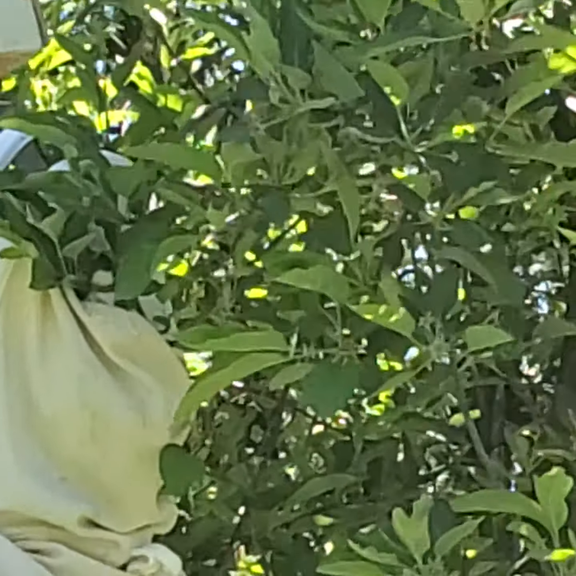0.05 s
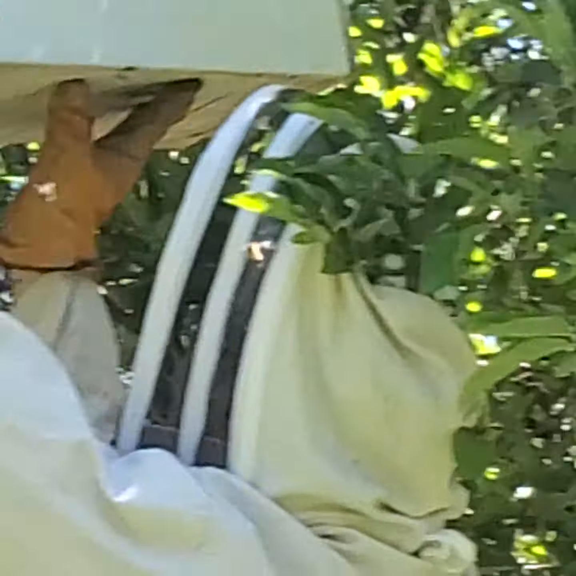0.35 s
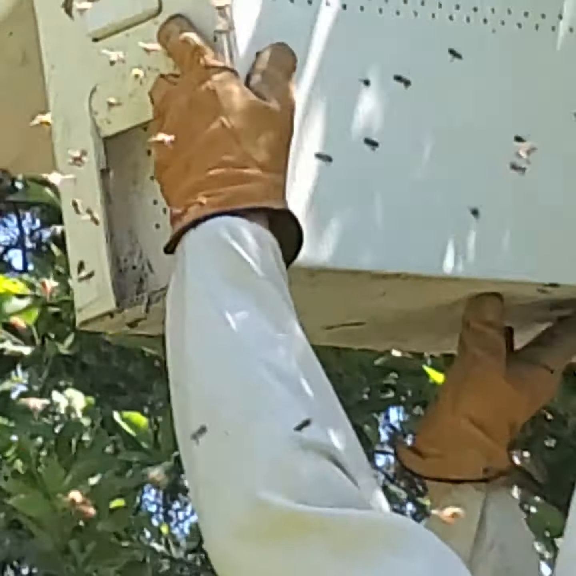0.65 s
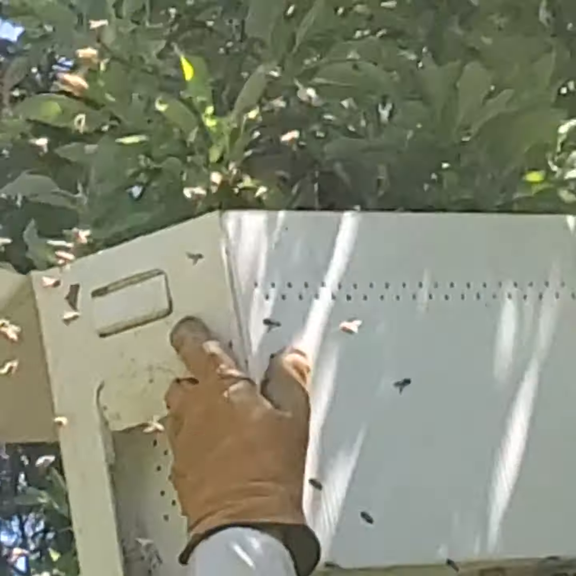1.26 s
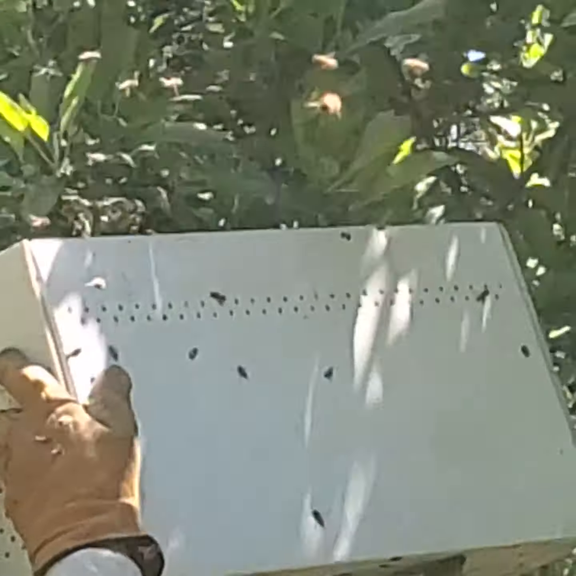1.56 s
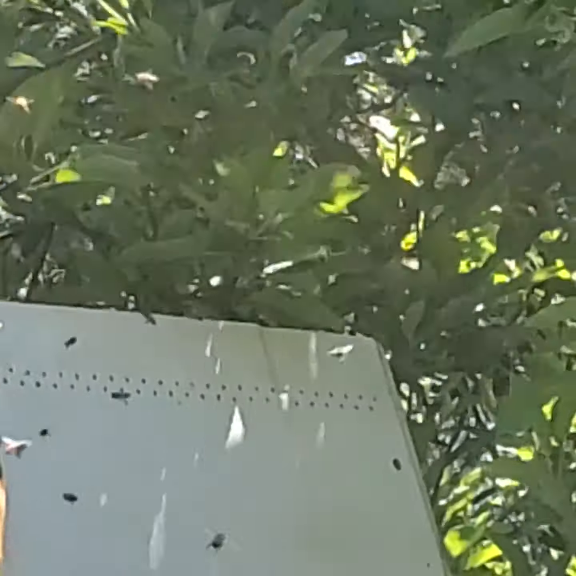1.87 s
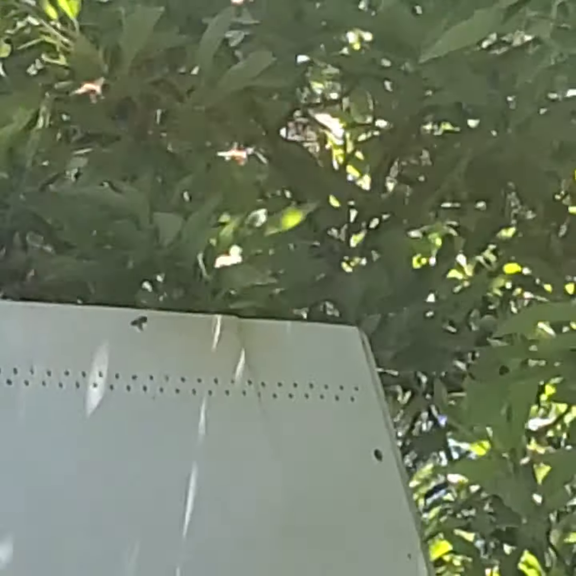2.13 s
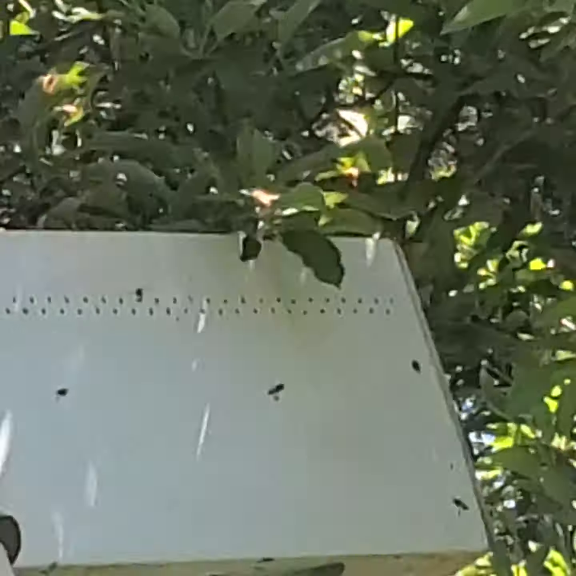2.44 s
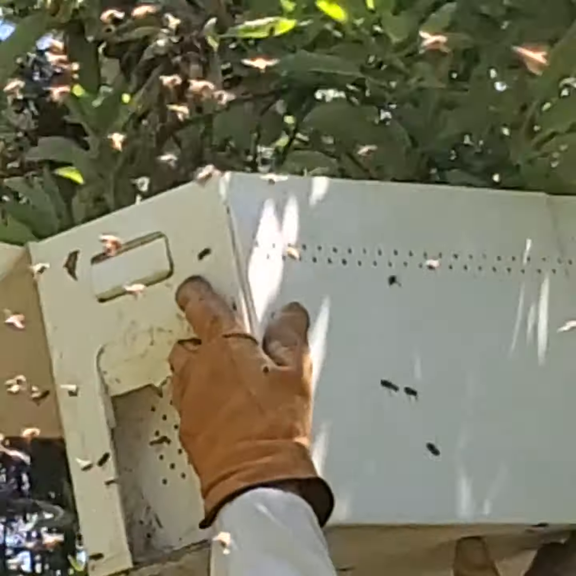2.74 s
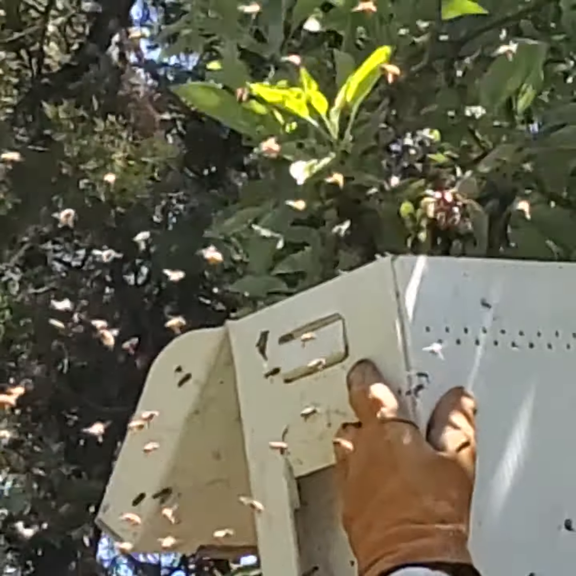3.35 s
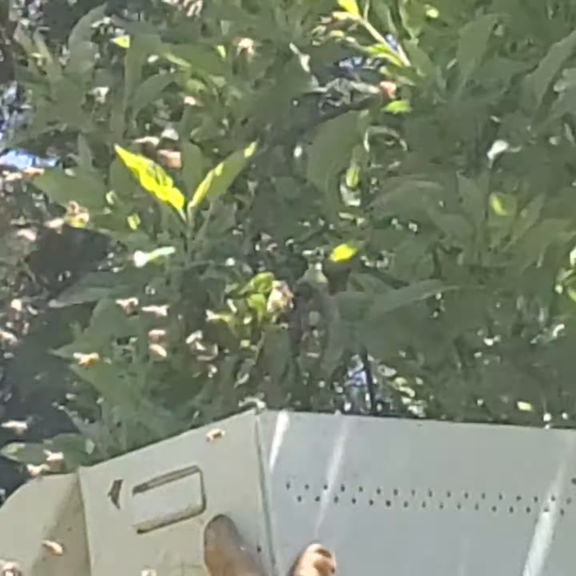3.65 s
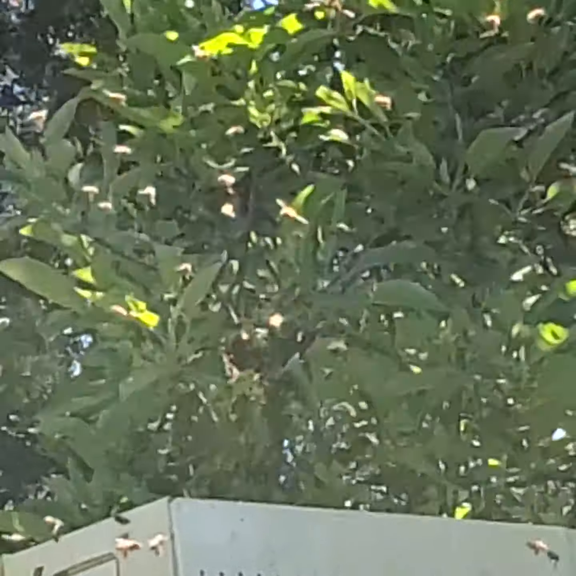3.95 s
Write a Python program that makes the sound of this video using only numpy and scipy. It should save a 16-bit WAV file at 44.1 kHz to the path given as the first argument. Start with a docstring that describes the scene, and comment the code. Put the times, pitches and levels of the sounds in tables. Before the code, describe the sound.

Many bees buzz at close range under a tree, loudest early on and gradually easing to a steadier hum. Individual bees glide past, while uneven low rumble and soft wind puffs reach the phone microphone.

```python
"""Honeybee swarm under a tree

A hive box is held up under a leafy tree, close to the two microphones of a hand-held phone.
Countless wingbeats merge into a rushing buzz that slowly thins; bees on the box hum at a steadier pitch.
Outdoor rumble swells, wind puffs on the right microphone, leaves hiss faintly and one sharp tick sounds."""
import sys
import numpy as np
from scipy.fft import rfft, irfft
from scipy.io import wavfile
from scipy.ndimage import uniform_filter1d, map_coordinates

SR = 44100
rng = np.random.default_rng(int(sys.argv[2]) if len(sys.argv) > 2 else 0)


def generate_wav(sig):
    """Save sig (samples, or channels by samples) to the path in sys.argv[1] as 16-bit PCM at SR."""
    pcm = np.round(np.clip(np.atleast_2d(sig).T, -1, 1) * 32767).astype(np.int16)
    wavfile.write(sys.argv[1], SR, pcm)


N = 176400
T, FREQS = np.arange(N) / SR, np.arange(N // 2 + 1) * SR / N


def undb(db):
    """Decibels to gain."""
    return 10 ** (np.asarray(db) / 20)


def unit(x):
    """Scale to rms 1."""
    return x / np.sqrt(np.mean(x ** 2))


def fader(rows):
    """Gain over time from (time [s], level [dB]) points."""
    return undb(np.interp(T, *np.array(rows).T))


def colour(x, rows):
    """Filter by (frequency [Hz], gain [dB]) points."""
    hz, db = np.array(rows).T
    return irfft(rfft(x) * undb(np.interp(np.log(FREQS + 1), np.log(hz), db)), N)


def walk(rate, t):
    """Smooth wander of spread near 1, through rate random points a second."""
    knots = rng.standard_normal(512)
    return map_coordinates(knots, [t * rate + 10 * rng.random()], order=3, mode="mirror")


def wingbeat(strengths, size=2048):
    """One cycle of a wing stroke: harmonics of the given strengths at random phases."""
    return irfft(np.r_[0, strengths * np.exp(2j * np.pi * rng.random(len(strengths)))], size)


def bees(count, wing_hz=220, spread=.125, swerve=.055):
    """Each bee is a harmonic-rich wingbeat with its own wandering pitch, distance and direction."""
    flutter, flyby_db = .009, 4  # flutter, spread and swerve are shares of the pitch
    mic_lag_s, off_centre_s = .00027, .00003  # travel time between the microphones, and its bias
    out, t = np.zeros((2, N)), np.linspace(0, N / SR, 800)
    for rank in (np.arange(count) + .5) / count:
        stroke = wingbeat(.5 + rng.random(32))
        detune = spread * np.log(rank / (1 - rank)) * np.sqrt(3) / np.pi  # bell-shaped across the bees
        hz = wing_hz * np.exp(detune + swerve * walk(4.5, t) + flutter * walk(35, t))
        nearness = np.interp(T, t, undb(flyby_db * walk(3.079, t)))
        lag_s = off_centre_s + mic_lag_s * np.tanh(walk(0.826, t))
        left_cycles = np.cumsum(np.interp(T, t, hz)) / SR
        right_cycles = left_cycles + np.interp(T, t, hz * lag_s)
        for mic, cycles in enumerate((left_cycles, right_cycles)):
            out[mic] += nearness * stroke[(cycles * len(stroke)).astype(int) % len(stroke)]
    return out


def swarm():
    """Two clouds of beating wings: a mellow one low round the phone, a brighter one round the box."""
    # buzz round the phone (frequency [Hz], gain [dB])
    low_colour = [(130, -22), (180, 5.5), (240, -6.5), (350, -11), (440, -8), (540, -2), (670, 4), (820, 4),
                  (1080, 3), (1300, -1.5), (1600, -5), (2000, -7.5), (2800, -25), (5000, -34.5),
                  (9000, -42)]
    # these bees are left behind as the box is raised (time [s], level [dB])
    low_level = [(0, -44), (.25, -44.5), (.5, -44.5), (.75, -47.5), (1.05, -48.5), (1.5, -55.5), (2.2, -60),
                 (4, -70)]
    # buzz round the box (frequency [Hz], gain [dB])
    high_colour = [(130, 5), (180, 1), (240, -4), (350, -10), (440, -8.5), (560, -4), (680, -5.5),
                   (820, -1), (1080, 1), (1300, -1.5), (1600, -2), (2000, -8), (2800, -14.5), (3800, -20.5),
                   (5000, -30.5), (6500, -30.5), (9000, -38)]
    # it slowly thins (time [s], level [dB])
    high_level = [(0.0, -46), (0.43, -45), (0.62, -45), (0.86, -43), (1.37, -47.5), (1.8, -47), (2.41, -51),
                  (2.85, -50.5), (2.97, -53.5), (3.26, -54.5), (4.0, -56)]
    low = unit(colour(bees(count=40), low_colour)) * fader(low_level)
    high = unit(colour(bees(count=72), high_colour)) * fader(high_level)
    return low + high


def box_hum():
    """Bees on the box beat their wings at nearly one pitch."""
    # tone of the hum (frequency [Hz], gain [dB])
    hum_colour = [(150, -20), (250, -1), (500, -0.5), (750, -10), (1000, -5.5), (1500, -4), (2000, -7),
                  (3000, -23.5), (6000, -23.5)]
    # hum at the microphones (time [s], level [dB])
    hum_level = [(0, -57), (1.4, -59.5), (2.2, -54.5), (4, -56)]
    wings = bees(count=28, wing_hz=248, spread=.065, swerve=.04)
    return unit(colour(wings, hum_colour)) * fader(hum_level)


def rumble():
    """Low, uneven outdoor rumble, nearly alike at both microphones."""
    # tone of the rumble (frequency [Hz], gain [dB])
    rumble_colour = [(20, -24), (32, -15), (48, -0.5), (62, 1.5), (80, -3), (100, 4), (118, -7.5),
                     (142, -11.5), (180, -9), (215, -23), (260, -18), (330, -23.5), (600, -34), (1500, -53),
                     (4000, -93)]
    # its swells and dips (time [s], relative level [dB])
    rumble_level = [(0.0, -44), (0.15, -45), (0.4, -44.5), (0.58, -42), (0.66, -50), (0.74, -43),
                    (0.82, -49.5), (0.95, -43), (1.25, -46), (1.44, -48), (1.5, -44.5), (1.77, -47),
                    (2.0, -49), (2.3, -50.5), (2.42, -46), (2.7, -46.5), (2.87, -50.5), (3.2, -48.5),
                    (3.5, -49.5), (4.0, -51)]
    gain_db, side_db = 3, -15.5
    mid, side = colour(rng.standard_normal((2, N)), rumble_colour)
    mid = mid / np.sqrt(uniform_filter1d(mid ** 2, size=3000))  # even out the noise's own swells
    stereo = mid + undb(side_db) * unit(side) * np.array([[1], [-1]])
    return stereo * fader(rumble_level) * undb(gain_db)


def leaf_hiss():
    """A faint, slightly flickering hiss of air and the leaves overhead."""
    # tone of the hiss (frequency [Hz], gain [dB])
    hiss_colour = [(300, 11), (1200, 3.5), (2500, 7.5), (4000, -3), (6000, -3), (9000, -2), (12000, -5),
                   (16000, -12.5)]
    # its rise and fall (time [s], relative level [dB])
    hiss_level = [(0, -70.5), (1.1, -71.5), (1.42, -72), (1.51, -69.5), (1.72, -72.5), (1.87, -71.5),
                  (2.35, -74.5), (2.52, -70), (2.82, -70.5), (3.2, -72), (4, -75.5)]
    gain_db, flicker_db = 9.5, 0.5
    air = unit(colour(rng.standard_normal((2, N)), hiss_colour))
    return air * fader(hiss_level) * undb(gain_db + flicker_db * walk(24.83, T))


def low_swells():
    """Brief low swells of the rumble in both channels, and wind puffs on the right microphone."""
    # swells and puffs (time [s], half length [s], left level [dB], right level [dB])
    swells = [(0.018, 0.017, -44, -36.5), (0.225, 0.029, -34, -40), (0.58, 0.022, -48, -34),
              (0.98, 0.03, -38.5, -38), (1.103, 0.017, -40, -41), (1.337, 0.013, -38.5, -38),
              (1.857, 0.022, -35, -36.5), (2.124, 0.016, -38.5, -39.5), (2.371, 0.013, -42, -30.5),
              (2.674, 0.02, -58, -38), (2.788, 0.035, -46, -28), (2.937, 0.0092, -46, -37),
              (3.604, 0.013, -39.5, -38)]
    # the rough noise in them (frequency [Hz], gain [dB])
    rough_colour = [(20, -7), (40, 8), (75, -1), (150, -1.5), (250, -19.5), (500, -22), (1500, -49),
                    (4000, -85)]
    swell_hz, wander_share, rough_db = 80, 0.195, -10
    hz = swell_hz * np.exp(wander_share * walk(70, T))
    sway = np.sqrt(2) * np.sin(2 * np.pi * np.cumsum(hz) / SR)
    rough = undb(rough_db) * unit(colour(rng.standard_normal((2, N)), rough_colour))
    envelope = sum(undb([[left], [right]]) * np.exp(-((T - at) / half) ** 2)
                   for at, half, left, right in swells)
    return (sway + rough) * envelope


def close_bees():
    """Single bees pass close to the microphones, swelling and gliding in pitch."""
    # fly-bys (time [s], half length [s], wingbeat [Hz], glide [Hz/s], level [dB])
    passes = [(0.412, 0.1, 214.1, 60, -50), (0.82, 0.09, 228, 329.5, -50.5), (1.052, .07, 198.9, -41, -53),
              (1.34, .05, 206, 0, -53.5), (2.078, 0.1, 244.3, 60.5, -54), (2.461, .07, 235.9, -560, -55),
              (2.693, .08, 210.7, -70, -54.5), (3.159, .07, 201.2, -330, -60)]
    # one bee at close range (frequency [Hz], gain [dB])
    bee_colour = [(220, -1), (440, -12), (660, -9.5), (860, -6.5), (1060, 9), (1230, 1.5), (1450, -2.5),
                  (2000, -12), (3000, -22.5), (6000, -38), (9000, -44)]
    flutter_share = .015
    out = np.zeros(N)
    for at, half, wing_hz, glide, db in passes:
        hz = wing_hz + glide * half * np.tanh((T - at) / half)
        cycles = np.cumsum(hz * (1 + flutter_share * walk(45, T))) / SR
        stroke = wingbeat(np.ones(32))
        wings = stroke[(cycles * len(stroke)).astype(int) % len(stroke)]
        swell = undb(db) * np.exp(-((T - at) / half) ** 2)
        out += unit(colour(wings, bee_colour)) * swell
    return out


def tick():
    """A tiny hard contact close by, a little to the right: one high mode that dies almost at once."""
    # the contact and its rebound (time [s], relative level [dB])
    contacts = [(1.4812, -33.5), (1.4829, -45)]
    mode_hz, decay_s, pan_db = 12500, 0.00019, [[-2], [2]]
    ring = np.zeros(N)
    for at, db in contacts:
        decay = (T >= at) * np.exp(-np.abs(T - at) / decay_s)
        ring += undb(db) * decay * np.sin(2 * np.pi * mode_hz * (T - at))
    return ring * undb(pan_db)


def scene():
    """Bees at close range over the sounds of the garden."""
    return swarm() + close_bees() + box_hum() + rumble() + low_swells() + leaf_hiss() + tick()


def record(dry):
    """The phone: two unlike microphones, a faint electrical whine, a treble notch and a steep top cut."""
    # left microphone's response (frequency [Hz], gain [dB])
    left_mic = [(400, 2), (700, 1.65), (2000, 2), (3600, 4.5), (5000, 6.5), (6100, 8), (6900, -2.5),
                (8200, -1), (10000, -2.5), (11000, 0), (12800, -1), (14000, -4), (16000, -3)]
    # right microphone's response (frequency [Hz], gain [dB])
    right_mic = [(400, 2), (700, 0.2), (2000, 1.5), (3600, 2.5), (4500, 2), (5600, -6), (6800, -7),
                 (8300, -6), (9300, 1.5), (12300, 4), (14000, 5.5), (16000, 12)]
    # steady whine in the left channel (frequency [Hz], level [dB])
    whine_tones = [(4995, -81.5), (10947, -83)]
    notch_hz, notch_half_width_hz, notch_db, top_hz = 7480, 445, -16, 15750
    whine = sum(np.sqrt(2) * undb(db) * np.sin(2 * np.pi * hz * T) for hz, db in whine_tones)
    heard = np.array([colour(dry[0], left_mic) + whine, colour(dry[1], right_mic)])
    notch = undb(notch_db * np.exp(-((FREQS - notch_hz) / notch_half_width_hz) ** 4))
    return irfft(rfft(heard) * notch * (FREQS < top_hz), N)


dry = scene()
out = record(dry)
generate_wav(out)
```